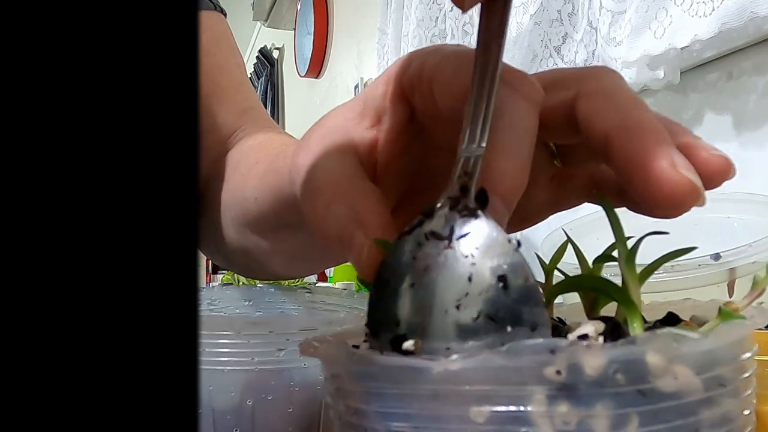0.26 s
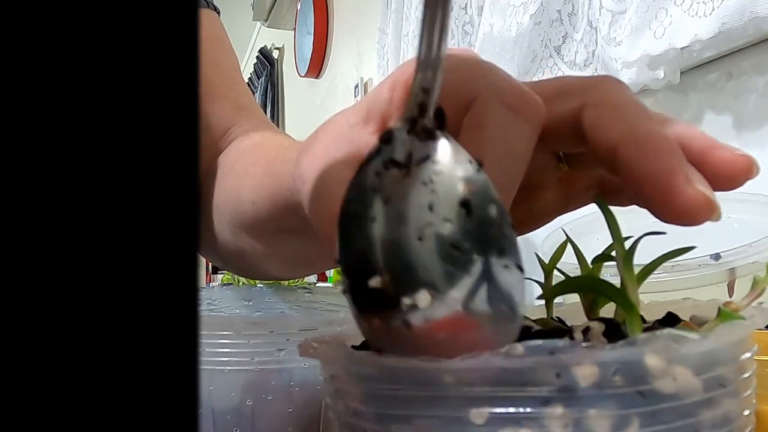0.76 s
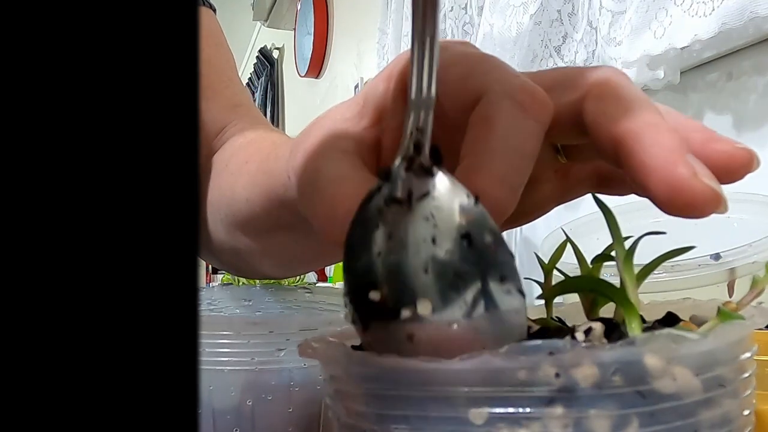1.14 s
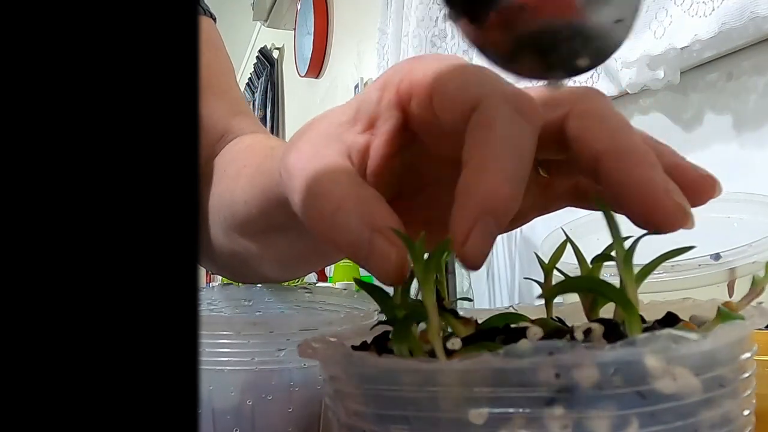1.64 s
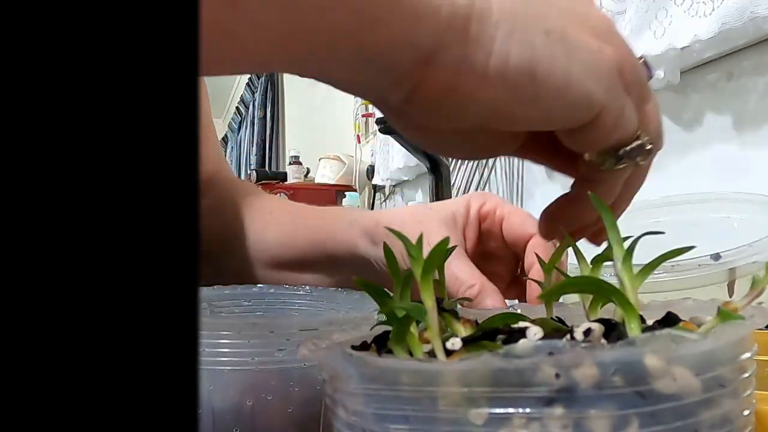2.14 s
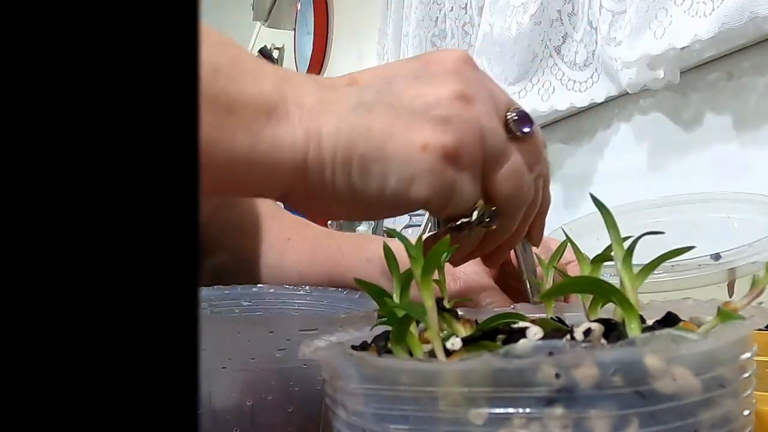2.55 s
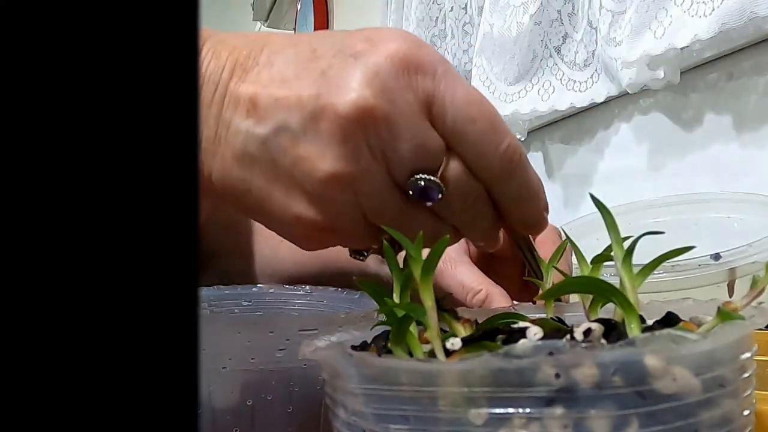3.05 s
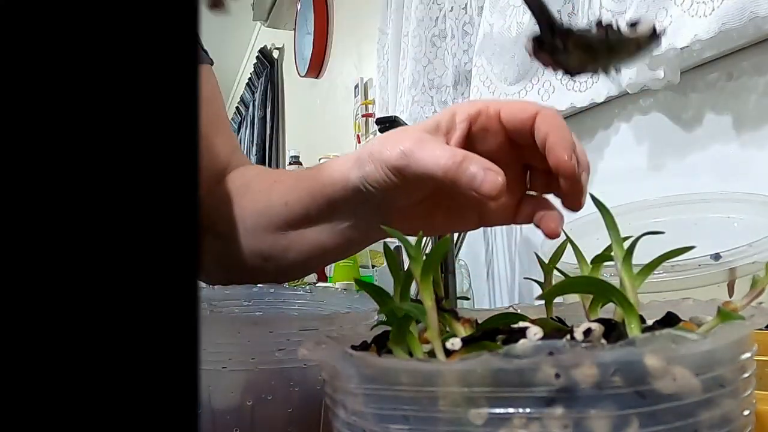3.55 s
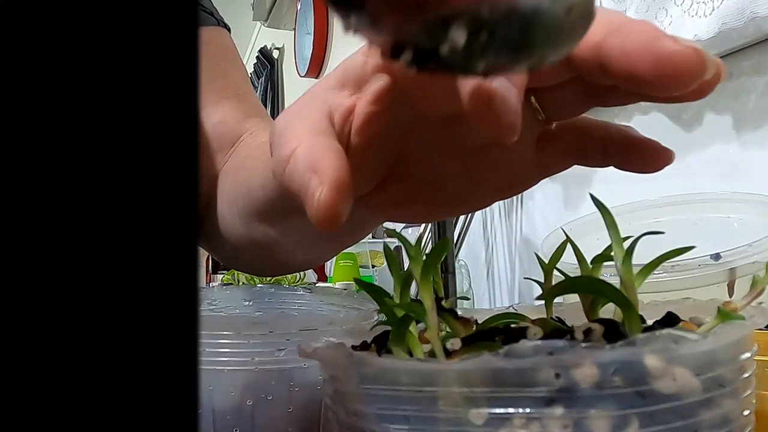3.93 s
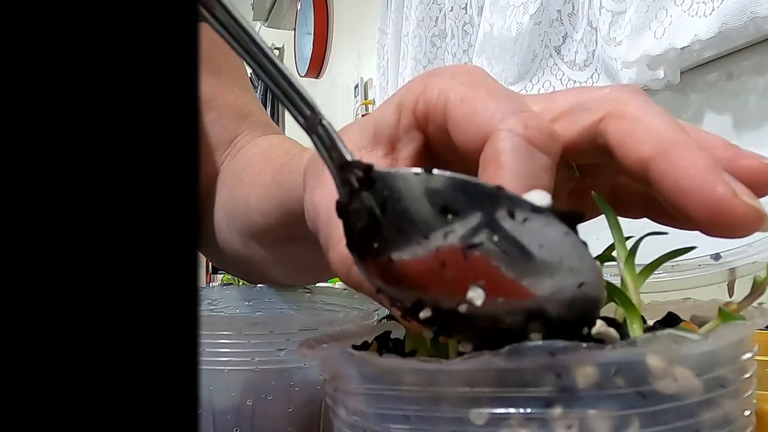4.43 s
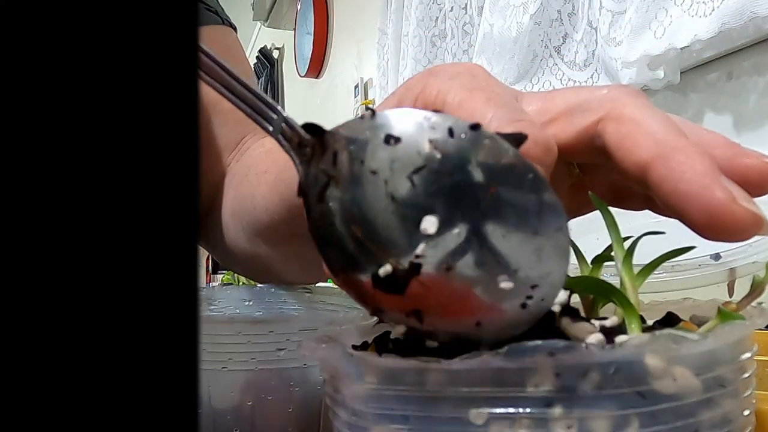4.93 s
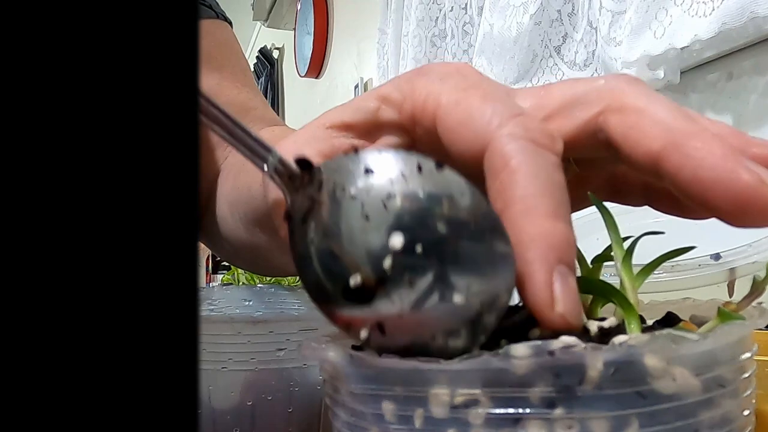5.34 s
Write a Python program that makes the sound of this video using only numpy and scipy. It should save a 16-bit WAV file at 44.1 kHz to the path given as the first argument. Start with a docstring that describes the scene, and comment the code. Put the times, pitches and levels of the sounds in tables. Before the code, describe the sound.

Close gritty crunches and snaps of potting chips under a spoon, duller knocking scoops further back, then a denser burst of crunching.

```python
"""Small room, phone on location: a low hum, rumble and faint hiss run under the whole take as filtered noise and a sine.
First, right in front of the phone, a metal spoon presses bark and perlite mix into a thin plastic pot:
random slips ring chip and spoon resonances, and torn-fibre bursts make the snaps and wall taps.
From 2.2 s it digs in a tub further back: slips and knocks ring the walls, the floor booms, bark rustles.
At 4.2 s a bit of mix drops dully; then the spoon crushes the chips down in the close pot again."""
import sys
import numpy as np
from scipy import signal
from scipy.fft import rfft, irfft
from scipy.io import wavfile

SR = 44100
rng = np.random.default_rng(int(sys.argv[2]) if len(sys.argv) > 2 else 0)


def put_to_file(sound):
    """Save the sound as 16-bit audio at rate SR, in the file named by the first command-line argument."""
    columns = np.atleast_2d(sound).T  # one column per channel
    safe = np.clip(columns, -1, 1)
    whole_steps = np.round(safe * 32767)
    wavfile.write(sys.argv[1], SR, whole_steps.astype(np.int16))


N = 246078
TIME = np.arange(N) / SR

# Event levels feed the mix: the functions below trim some of them again.
# Room rumble and hiss spectra: (frequency [Hz], gain [dB])
RUMBLE_SPECTRUM = [(20, -10), (30, -6), (38, 0), (48, 1), (60, -6), (75, -11), (100, -10), (130, -15.5),
                   (168, -9), (210, -21), (320, -24), (450, -32), (700, -48), (2000, -80)]
HISS_SPECTRUM = [(200, 0), (1000, 0), (2500, 0), (5000, -3), (8000, -8), (10500, -17), (15000, -27)]
RUMBLE_DB, HISS_DB = -54.5, -71
HUM_HZ, HUM_DB = 49.1, -47.2

# Spoon pushes the mix down in the close pot:
# (time at full force [s], build-up [s per 20 dB], hold [s], crunch level [dB])
PUSHES = [(0, .02, 0.0089, -34), (0.041, 0.11, 0.094, -41.5), (0.258, 0.36, 0.016, -47),
          (0.31, 0.076, 0.17, -56), (0.558, .06, 0.058, -45.5), (0.722, 0.11, 0.025, -57),
          (0.831, 0.024, 0.0052, -47), (1.083, 0.0055, .006, -45), (1.115, 0.017, 0.025, -40.5),
          (1.175, 0.081, 0.085, -58), (1.369, 0.014, 0.012, -46.5), (1.435, 0.084, 0.0045, -60),
          (1.682, 0.015, 0.0059, -66), (4.311, 0.026, 0.011, -60), (4.399, 0.0072, 0.041, -52.5),
          (4.605, 0.018, 0.003, -58), (4.822, 0.052, 0.0057, -41.5), (4.887, .03, 0.025, -53),
          (4.98, 0.076, 0.0088, -54.5), (5.036, 0.018, 0.016, -44.5), (5.083, 0.021, 0.012, -41.5),
          (5.134, 0.0075, .042, -36.5), (5.377, 0.013, .014, -39.5), (5.493, 0.12, 0.12, -44.5)]
PUSH_RELEASE_S = 0.025  # time to fall 20 dB
# after each stroke the loose mix trickles on: level re stroke [dB], time to fall 20 dB [s]
SETTLE_DB, SETTLE_S = -20.5, 0.27
# Spectrum of bark grinding in the pot: (frequency [Hz], gain [dB])
BARK_SPECTRUM = [(200, -11.5), (450, -14), (700, -8), (930, -4), (1350, -6), (1750, -3), (2100, -3.5),
                 (2500, 5.5), (3100, -3), (3850, -0.5), (4700, -6.5), (6400, -9.5), (9500, -19.5),
                 (15500, -35)]
# Resonances of the spoon: (frequency [Hz], width [Hz], relative level [dB])
SPOON_MODES = [(2230, 190, 2), (3560, 250, -46), (6000, 400, -44), (7930, 110, 22.5), (9100, 300, 14.5),
               (11900, 240, 8.5), (13400, 140, 7)]
BOWL_DRIVE_DB = -27  # how far each push drives the bowl's ring, re crunch
# Grit slides over the spoon's bowl: (time [s], length [s], level [dB])
SLIDES = [(0, 0.12, -60), (0.718, .015, -65), (1.217, 0.025, -65), (1.519, 0.0061, -72), (5.135, 0.01, -47),
          (5.238, 0.0089, -54.5), (5.53, 0.065, -63)]
SLIDE_BUILD_S, SLIDE_RELEASE_S = 0.01, 0.043  # times for a change of 20 dB

# Loudest chips that snap or land in the pot:
# (time [s], level [dB], chip pitch [Hz], pot wall drive [dB re level], crack [dB re level])
SNAPS = [(.014, -27, 3300, 1.5, -13), (.049, -37, 2340, -4, -9), (.097, -34.5, 2500, -19, -18),
         (.245, -40.5, 3700, 2, -30), (.318, -44, 2380, 12.5, -12), (.379, -48, 2400, -23, -19),
         (.455, -45.5, 2260, -25, -12), (.601, -30, 3470, 4.5, -40), (.616, -46.5, 3600, -9, -30),
         (.831, -33.5, 2310, 0, -46), (.841, -40, 2460, -26, -35), (.861, -43.5, 2400, -13, -28),
         (.891, -48.5, 2500, -20, -40), (1.085, -41, 2670, -8, -26), (1.091, -37.5, 2480, -9, -25),
         (1.113, -36.5, 1580, 0, -30), (1.367, -41.5, 2290, -9, -27), (1.436, -48.5, 2500, -0.5, -13),
         (4.054, -47.5, 2850, 8, -19), (4.22, -35.5, 1680, -24, -12), (4.776, -30.5, 2680, -37, -22),
         (4.808, -34.5, 3040, -22, -20), (4.816, -29, 3180, 0, -20), (4.872, -28.5, 1540, -4, -20),
         (4.911, -40, 1630, -21, -37), (4.961, -34.5, 2500, -24, -12), (4.984, -34, 2030, 4, -36),
         (4.993, -38, 2270, 9, -41), (5.04, -26.5, 2170, 8, -39), (5.057, -33.5, 2310, -3, -14),
         (5.079, -30, 2350, -1, -30), (5.085, -28, 2580, 0.5, -35), (5.098, -29.5, 2580, 1.5, -31),
         (5.139, -33, 2270, 8, -13), (5.187, -30, 1880, -7, -17), (5.265, -38.5, 2600, -2.5, -26),
         (5.29, -44.5, 2330, -13, -30), (5.331, -47, 2470, 0, -8), (5.355, -44, 2400, -1, -3),
         (5.375, -35, 3070, -4, -9), (5.409, -38.5, 2460, 2, -29), (5.424, -40.5, 2550, 7, -15),
         (5.493, -34.5, 3720, -29, -21), (5.503, -36.5, 3820, -24, -22), (5.534, -33.5, 4580, 0.5, -32)]
# A few squeezed chips spring back after each push; level is re that push
SPRING_WITHIN_S, SPRING_DB, SPRING_SPREAD_DB = 0.11, -9.5, 5.5
SPRING_HZ, SPRING_SPREAD_OCTAVES = 2650, 0.098
SPRING_WALL_DB, SPRING_CRACK_DB = 4, -14  # re the chip's level
# Resonances of the pot wall: (frequency [Hz], width [Hz], relative level [dB])
POT_MODES = [(620, 120, -11), (930, 170, 0), (1130, 140, -4)]
# Spoon shoves the thin pot wall, which buckles: (time [s], level [dB], pitch [Hz])
BUCKLES = [(0.271, -49, 768), (.6, -42.5, 1000), (.84, -50, 740), (1.14, -40.5, 1010), (4.82, -30.5, 1110),
           (4.874, -42, 1570), (5.184, -42, 1510), (5.376, -42.5, 530), (5.387, -49, 380)]

# Spoon digs in the tub: (time at full force [s], build-up [s per 20 dB], hold [s],
# release [s per 20 dB], grinding level [dB], floor boom level [dB], rustle level [dB])
DIGS = [(2.246, 0.013, .018, 0.052, -49, -46, -56), (2.349, 0.043, 0.018, .05, -45, -48.5, -59),
        (2.405, 0.047, 0.034, 0.083, -35.5, -37.5, -48), (2.566, 0.088, 0.0056, 0.054, -38, -40.5, -44),
        (2.604, 0.027, 0.046, 0.042, -34.5, -38.5, -45), (2.73, 0.024, 0.061, .05, -39.5, -48, -44),
        (2.784, 0.018, 0.0073, 0.061, -35, -36, -41), (2.844, 0.047, 0.073, 0.19, -44.5, -56, -52),
        (2.975, .08, 0.072, .11, -47, -51.5, -59), (3.199, 0.039, 0.0076, 0.057, -51.5, -55.5, -59.5),
        (3.257, .015, 0.0088, 0.13, -51.5, -56, -58.5)]
# Resonances of the tub's walls and floor: (frequency [Hz], width [Hz], relative level [dB])
TUB_MODES = [(450, 22, -8), (543, 18, -10), (615, 20, 1), (775, 60, -2), (828, 40, -2), (915, 80, 0),
             (1019, 40, -4), (1109, 30, 0), (1325, 100, 0), (1509, 55, 1), (1666, 70, -3), (1850, 60, -8),
             (1955, 40, -7), (2140, 140, -7), (2420, 80, -7)]
TUB_FLOOR_MODES = [(116, 42, 1.5), (166.3, 7.3, 2.5), (266, 170, -8)]
# Spectrum of loose bark rustling in the tub: (frequency [Hz], gain [dB])
RUSTLE_SPECTRUM = [(300, -18.5), (1000, 3), (2500, -7.5), (3300, 2), (4200, -0.5), (5000, -2), (6300, -6),
                   (9000, -10.5), (12000, -20), (15500, -27)]
# Chips jam and jump against the tub: (time [s], level [dB], pitch [Hz], crack [dB re level])
KNOCKS = [(2.334, -40, 676, -32), (2.396, -31, 770, -21), (2.404, -29.5, 1200, -19),
          (2.411, -28, 1170, -28), (2.561, -31.5, 805, -58), (2.608, -37.5, 1310, 4),
          (2.639, -33, 1360, -26), (2.729, -36, 860, -8.5), (2.75, -29, 870, -31), (2.786, -26.5, 860, -18),
          (2.788, -26.5, 680, -26), (2.798, -29.5, 584, 0), (3.157, -43, 990, -3.5),
          (3.195, -52.5, 1310, 2.5), (3.255, -43, 1300, 5)]

DROP_S = 4.221
TOP_HZ = 15750  # upper limit of the phone's microphones


def undb(db):
    """Decibels to gain."""
    return 10 ** (np.asarray(db) / 20)


def unit(x):
    """Scale to rms 1."""
    return x / np.sqrt(np.mean(x ** 2))


def add(track, s, sound):
    """Mix a sound in at time s."""
    i = max(int(s * SR), 0)
    track[:, i:i + sound.shape[1]] += sound[:, :N - i]


def ring(x, hz, width):
    """One damped resonance, gain 1 at its centre."""
    hz = min(hz, 0.45 * SR)
    b, a = signal.iirpeak(hz, hz / min(width, SR / 4), fs=SR)
    return signal.lfilter(b, a, x + 1e-18)  # the tiny offset avoids denormals


def colour(x, points, size=4096):
    """Causal minimum-phase filter with the gain of (frequency [Hz], gain [dB]) points."""
    hz, db = np.transpose(points)
    grid = np.arange(size + 1) * SR / (2 * size)
    log_gain = np.log(undb(np.interp(np.log(grid + 1), np.log(hz), db)))
    cepstrum = irfft(log_gain)[:size]
    cepstrum[1:] *= 2  # fold onto positive time: nothing sounds early
    response = irfft(np.exp(rfft(cepstrum, 2 * size)))[:size]
    return signal.oaconvolve(np.atleast_2d(x), response[None], axes=1)[:, :N]


def at_ports(hz, size):
    """Random strengths at the two microphone ports: the shorter the wave, the less alike they are."""
    own = (hz / (hz + 7500)) ** 1.5
    shared, *apart = rng.standard_normal((3, size))
    return np.sqrt(1 - own) * shared + np.sqrt(own) * np.array(apart)


def wander(rate):
    """Smooth chance with about `rate` turns a second."""
    knots = rng.standard_normal(1024)
    return np.interp(TIME * rate, np.arange(1024), knots)


def swell(s, build_s, hold_s, release_s, db):
    """Gain of one stroke: it builds up to time s, holds and lets go."""
    early = np.maximum(s - TIME, 0)
    late = np.maximum(TIME - s - hold_s, 0)
    steps = early / max(build_s, 1e-3) + late / max(release_s, 1e-3)  # of 20 dB each
    return undb(db - 20 * np.minimum(steps, 10))


def strokes(rows):
    """Gain of a run of strokes, each followed by the trickle of settling mix."""
    power = np.zeros(N)
    for s, build_s, hold_s, release_s, db in rows:
        stroke = swell(s, build_s, hold_s, release_s, db)
        trickle = swell(s, build_s, hold_s, SETTLE_S, db + SETTLE_DB)
        power += np.maximum(stroke, trickle) ** 2
    return np.sqrt(power)


def slips(rate, spread_db):
    """Tiny slips between chips: impulses at random moments, a few much larger than the rest."""
    size = undb(spread_db * np.minimum(rng.standard_normal(N), 2))
    return (rng.random(N) < rate / SR) * size * rng.choice([-1, 1], N)


def body(push, modes, patchy_db):
    """Every slip meets each mode with its own strength, and the contact keeps shifting."""
    out = np.zeros((2, N))
    moments = np.flatnonzero(push)
    for hz, width, db in modes:
        strength = at_ports(hz, len(moments))
        contact = undb(db + patchy_db * wander(rate=60)[moments])
        drive = np.zeros((2, N))
        drive[:, moments] = push[moments] * strength * contact
        out += ring(drive, hz, width)
    return unit(out)


def chips(push, sharpness, count):
    """Chips of all sizes, each ringing for a few cycles."""
    pitches = np.geomspace(220, 14000, count)
    return body(push, [(hz, hz / sharpness + 40, 0) for hz in pitches], patchy_db=3.5)


def fracture(hz, width, decay_s, size=1500):
    """A quick run of tearing fibres rings a resonance; rms 1 when counted over 4 ms."""
    tear = at_ports(hz, size) * np.exp(-np.arange(size) / (decay_s * SR))
    y = ring(ring(tear, hz, width), hz, 2 * hz)
    return y * np.sqrt(2 * 0.004 * SR / np.sum(y ** 2))


def room_tone():
    """A low steady hum over rumble and faint hiss; only the bass is alike on both sides."""
    shared, *sides = unit(colour(rng.standard_normal((3, N)), RUMBLE_SPECTRUM))
    highpass = signal.butter(1, 330, "high", fs=SR, output="sos")
    apart = signal.sosfilt(highpass, np.array(sides))
    rumble = undb(RUMBLE_DB) * (shared + undb(3) * apart)
    hum = undb(HUM_DB) * unit(np.sin(2 * np.pi * HUM_HZ * TIME))
    hiss = undb(HISS_DB) * unit(colour(rng.standard_normal((2, N)), HISS_SPECTRUM))
    return hum + hiss + rumble


def pressing(crunch):
    """The mix grinds under the spoon; grit sliding over the bowl wakes its high modes."""
    slide = sum(swell(s, SLIDE_BUILD_S, length, SLIDE_RELEASE_S, db) for s, length, db in SLIDES)
    scrape = undb(BOWL_DRIVE_DB) * crunch + slide
    push = slips(rate=1700, spread_db=5)
    grinding = unit(colour(chips(push, sharpness=7, count=26), BARK_SPECTRUM))
    singing = body(slips(rate=2500, spread_db=4), SPOON_MODES, patchy_db=3)
    return undb(2) * crunch * grinding + undb(5) * scrape * singing


def springing(count=3):
    """Rows like SNAPS for the lesser chips that spring back as each push lets go."""
    rows = []
    for s, _, hold_s, db in PUSHES:
        for k, (late, loud, high) in enumerate(rng.uniform(-1.1, 1, (count, 3))):
            start = s + hold_s + SPRING_WITHIN_S * (k + (1 + late) / 2) / count
            level_db = db + SPRING_DB + SPRING_SPREAD_DB * loud
            hz = SPRING_HZ * 2 ** (SPRING_SPREAD_OCTAVES * high)
            rows.append((start, level_db, hz, SPRING_WALL_DB, SPRING_CRACK_DB))
    return [row for row in rows if row[0] < TIME[-1]]


def snapping():
    """Each snap is a bright crack, the chip's own brief note and a tap on the pot wall, which also buckles."""
    notes, taps, cracks, buckles = np.zeros((4, 2, N))
    for s, db, hz, wall_db, crack_db in list(SNAPS) + springing():
        add(notes, s, undb(db) * fracture(hz, width=850, decay_s=0.0009))
        add(taps, s, undb(db + wall_db) * fracture(hz=850, width=710, decay_s=0.00034))
        add(cracks, s, undb(db + crack_db) * fracture(hz=6000, width=3600, decay_s=0.0011))
    for s, db, hz in BUCKLES:
        add(buckles, s, undb(db) * fracture(hz, width=330, decay_s=0.004))
    wall = sum(undb(db) * ring(taps, hz, width) for hz, width, db in POT_MODES)
    return undb(0.5) * notes + undb(-7) * wall + undb(3) * cracks + buckles


def echoes(x, t60, low_hz, high_hz):
    """Dense reflections, different at each microphone port."""
    t = TIME[:SR // 2]
    decay = undb(-60 * t / t60)
    onset = 1 - np.exp(-t / (0.049 * t60))
    tail = rng.standard_normal((2, len(t))) * decay * onset
    band = signal.butter(2, [low_hz, min(high_hz, 0.45 * SR)], "band", fs=SR, output="sos")
    tail = signal.sosfilt(band, tail)
    tail /= np.sqrt(np.sum(tail ** 2) / 2)
    return signal.fftconvolve(x[None], tail, axes=1)[:, :N]


def digging():
    """Chips shove along the tub: its walls ring, its floor booms, loose bark rustles."""
    grind = strokes((*timing, db) for *timing, db, _, _ in DIGS)
    boom = strokes((*timing, db) for *timing, _, db, _ in DIGS)
    rustle = strokes((*timing, db) for *timing, _, _, db in DIGS)
    push = slips(rate=1300, spread_db=4.5)
    walls = undb(0.05) * grind * body(push, TUB_MODES, patchy_db=2)
    floor_ring = ring(body(push, TUB_FLOOR_MODES, patchy_db=4), hz=147.5, width=520)
    floor = undb(1.5) * boom * unit(floor_ring)
    loose_chips = chips(push + slips(rate=3000, spread_db=1.5), sharpness=6.9, count=22)
    loose = undb(4) * rustle * unit(colour(loose_chips, RUSTLE_SPECTRUM))
    knocks = np.zeros((2, N))
    for s, db, hz, crack_db in KNOCKS:
        add(knocks, s, undb(db) * fracture(hz, width=180, decay_s=0.0039))
        add(knocks, s, undb(db + crack_db) * fracture(hz=3400, width=2400, decay_s=0.003))
    # the knocks keep the tub's walls ringing
    after = sum(undb(db) * ring(knocks, hz, width) for hz, width, db in TUB_MODES)
    return walls + floor + loose + undb(-3) * knocks + undb(-4) * after


def dropping(db, hz, width, decay_s):
    """A bit of mix falls off the spoon and leaves a brief dull ring."""
    out = np.zeros((2, N))
    add(out, DROP_S, undb(db) * fracture(hz, width, decay_s, size=4000))
    return out


def scene():
    """The pot is close and dry, the tub further off; both reach the right port first."""
    crunch = strokes((s, build_s, hold_s, PUSH_RELEASE_S, db) for s, build_s, hold_s, db in PUSHES)
    pot = pressing(crunch) + snapping()
    pot += dropping(db=-38, hz=1570, width=330, decay_s=0.0088)
    tub = digging()
    left, right = pot + tub
    left = np.convolve(left, [0, 0.4, 0.6])[:N]  # 1.6 samples later, slightly softer on top
    # the left port's own tone: (frequency [Hz], gain [dB])
    left = colour(left, [(100, -2.0), (500, 1.0), (1200, -1.05), (2200, 0.16),
                         (4500, -1.2), (9000, 0.1), (13000, -1.7)])[0]
    # hand, rim and table top throw the treble back within a few milliseconds
    nearby = undb(-12) * echoes(pot[1], t60=0.025, low_hz=2200, high_hz=9000)
    # the more distant tub sends more of its sound into the room
    to_room = (pot + undb(4) * tub).mean(axis=0)
    room = undb(-20) * echoes(to_room, t60=0.28, low_hz=300, high_hz=6900)
    return np.array([left, right]) + nearby + room + room_tone()


def record(dry):
    """The phone cuts the top: a steep low-pass at TOP_HZ."""
    lowpass = signal.ellip(10, 0.2, 80, TOP_HZ, fs=SR, output="sos")
    return signal.sosfilt(lowpass, dry)


dry = scene()
out = record(dry)
put_to_file(out)
```